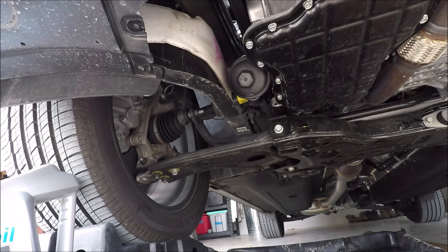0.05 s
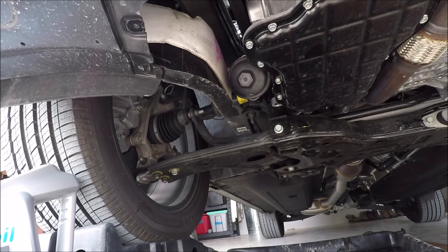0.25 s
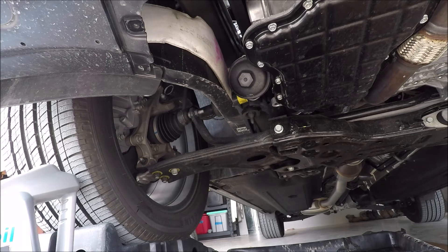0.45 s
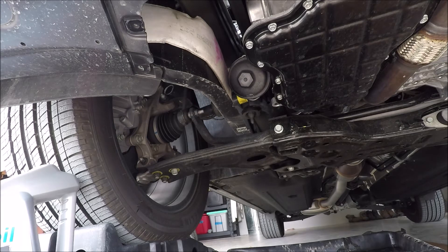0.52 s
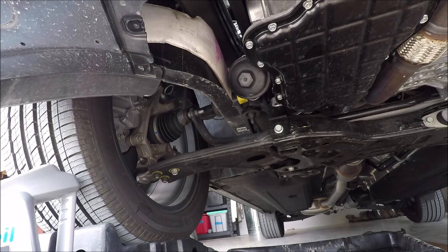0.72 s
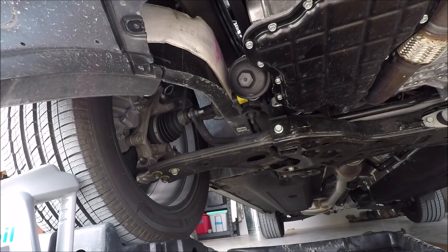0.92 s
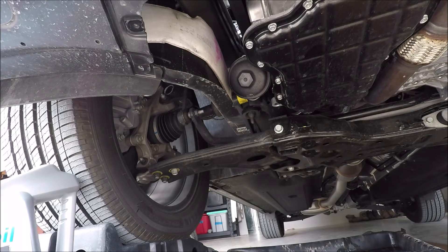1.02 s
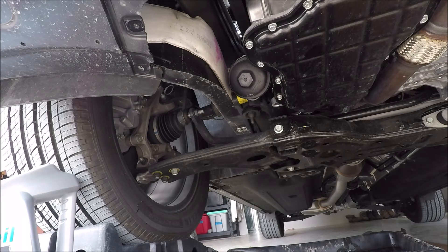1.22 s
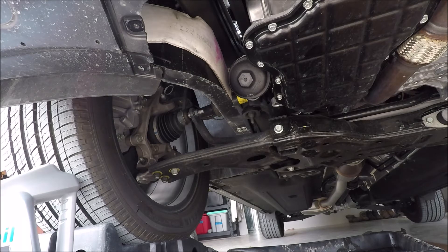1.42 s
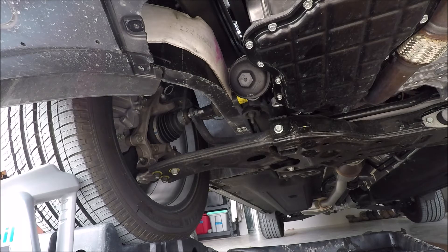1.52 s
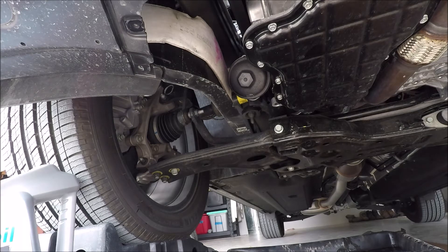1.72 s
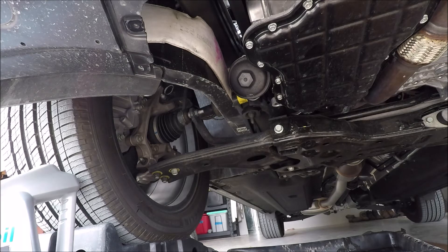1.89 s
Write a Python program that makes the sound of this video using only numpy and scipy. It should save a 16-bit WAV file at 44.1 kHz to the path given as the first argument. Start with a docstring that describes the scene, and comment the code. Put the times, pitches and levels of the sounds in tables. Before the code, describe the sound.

Oil drops into a drip pan under a car: one faint, one loud and sharp, then two very weak; cloth rustles, snaps and low handling knocks come between, close up over a faint garage rumble and hum.

```python
"""Throughout, a garage rumbles and hums faintly (shaped noise, wavering sine) and cloth rustles and crackles.
Cloth snaps come from the start; at 0.3 s a drop falls into a drip pan under a car, with a dull knock.
A low knock and snaps follow at 0.65 s, the loudest drop at 0.9 s, then knocks and snaps from 1.03 s
and two weak drops near 1.35 s. Drops are struck pan modes plus noise, snaps resonant noise bursts,
knocks damped sines. Drops and snaps also reverberate."""
import sys
import numpy as np
from scipy import signal
from scipy.fft import rfft, irfft
from scipy.io import wavfile
from scipy.ndimage import uniform_filter1d

SR = 44100
rng = np.random.default_rng(int(sys.argv[2]) if len(sys.argv) > 2 else 0)


def field_ratio(decibels):
    """Amplitude ratio for a level in dB (20 dB per decade); scalars and array-likes work."""
    return 10 ** (np.asarray(decibels, dtype=float) / 20)


def inscribe(sig):
    """Save sig as 16-bit PCM at rate SR to the path in sys.argv[1].

    A 1-D sig is mono; a 2-D sig holds one channel per row.
    Samples are clipped to [-1, 1] before scaling.
    """
    pcm = np.round(np.clip(np.atleast_2d(sig).T, -1, 1) * 32767)
    wavfile.write(sys.argv[1], SR, pcm.astype(np.int16))


N = 85995

# garage air spectrum, relative: (frequency [Hz], density [dB per Hz])
AIR_SPECTRUM = [(12, -22), (20, -4), (37, 4.5), (83, 0), (172, -24.5), (216, -16.5), (255, -21), (293, -21),
                (388, -25.5), (718, -35), (2140, -31.5), (2460, -29), (6360, -38.5), (14700, -48),
                (16000, -46)]
AIR_RMS_DB, PATCH_RMS_DB, SWELL_RMS_DB = -48.5, 1.2, 0.4
HUM_HZ, HUM_WAVER_RMS_HZ, HUM_WAVER_RMS_DB, HUM_DB = 143.3, 3, 4, -57.5

# reverberation under the car: (frequency [Hz], t60 [s])
ROOM_DECAY = [(300, 0.19), (2300, 0.55), (5000, 0.54), (12000, 0.36)]
ROOM_DB = -22.5

# cloth movement in stretches: (time [s], mid level [dB], treble re mid [dB],
# low rub re mid [dB], rub near 1 kHz re mid [dB])
CLOTH_MOVEMENT = [
    [(0.0, -64, -14, -1, -6), (0.004, -67, -21, 3, 0), (0.012, -51.5, -4.5, -7, -21),
     (0.032, -64, -23, -10, 0.5), (0.044, -59.5, -27, -11, -8), (0.066, -62.5, -23, -2, -1),
     (0.076, -57.5, -13, 1, -1), (0.082, -57.5, -33, 2, -9.5), (0.126, -61, -15, -8, 3),
     (0.136, -59, -4, 2.5, -9), (0.166, -61.5, -15, 10.5, -5), (0.178, -57.5, -7, -2, 4),
     (0.214, -50.5, 0, -1, -9.5), (0.266, -54.5, -12, 2.5, -1.5), (0.292, -59, -12, 4, -6),
     (0.322, -58, -23, 0.5, -4)],
    [(0.342, -59, -3, 6, 0), (0.356, -52.5, -8.5, -0.5, -11), (0.43, -57, -0.5, 10.5, 6),
     (0.446, -56.5, -51, 2.5, -4.5), (0.476, -67, -15, 4, -3), (0.528, -54, -16, -4, -15),
     (0.546, -64.5, -26, -5, -10), (0.554, -73, -8, 6, 3), (0.602, -77.5, -7, 13, -7),
     (0.648, -46.5, 3, -9, -2), (0.684, -53, -7, 5.5, -1.5), (0.758, -74, -8, 10.5, -4),
     (0.78, -65, -10, -14, -7), (0.8, -68.5, -10, 8, -4), (0.866, -62, -9, -1, -10),
     (0.885, -67, -17, 14, 10)],
    [(1.045, -65.5, 1.5, -1, -14), (1.049, -81, -16, 32, 11), (1.059, -58, -8, 2, -3),
     (1.075, -46, -3, 3.5, -4.5), (1.079, -46.5, -7.5, 5.5, -1)],
    [(1.089, -45, -7, 0, -3), (1.103, -60.5, -11, 9, -6), (1.199, -58.5, -11.5, -4.5, -5),
     (1.247, -69.5, -12, 0.5, -8), (1.311, -63.5, -15, 5.5, -17), (1.341, -70, 2, 8, 2),
     (1.351, -71.5, -21, -24, 5), (1.361, -70.5, -6, -6, -11), (1.371, -65, -28, -21, -21),
     (1.389, -74, -16, 10, -15), (1.409, -59, -8, -5.5, -11.5), (1.623, -54.5, -15, -1, -7.5),
     (1.773, -76, -8, 2, 1.5), (1.895, -52, -13, 0, -10), (1.917, -66, -12, 9.5, 6),
     (1.95, -56, -16, 1, -9.5)],
]
# cloth band spectra, relative: (frequency [Hz], density [dB per Hz])
CLOTH_MID_SPECTRUM = [(760, -36), (1300, -18.5), (1630, -1.5), (1810, 5), (1990, 3), (2350, 5.5), (2730, 5),
                      (3250, 1.5), (3470, -2.5), (3930, 5.5), (4390, 1), (5240, 6.5), (6520, -15),
                      (7070, -51), (7500, -11), (9750, -69), (16500, -120)]
CLOTH_TOP_SPECTRUM = [(3820, -96), (6500, 4), (7060, -2.5), (11400, -4.5), (14500, 0.5), (15600, -11),
                      (16000, -25)]
CLOTH_LOW_SPECTRUM = [(110, -18), (180, 3), (210, -11), (307, -4), (360, -2.5), (457, -1), (700, -22),
                      (910, -74), (1540, -120)]
CLOTH_KHZ_SPECTRUM = [(380, -21), (650, -21), (720, -8), (993, 3), (1270, -10.5), (1400, -9), (1820, -33),
                      (3080, -120)]
CRACKLES_PER_S, CRACKLE_SIZE_DB, CRACKLE_DECAY_S = 800, -0.5, 0.0015
CRACKLE_SHARE_LOW, CRACKLE_SHARE_MID, CRACKLE_SHARE_TOP = 0.15, 0.49, 0.69
STREAK_DB = 5.5  # rms from 1500 Hz up, less below

# sharp snaps of cloth: (time [s], peak [dB], centre [Hz], t60 of the drive [s])
SNAPS = [(.015, -44.5, 3900, 0.0054), (.075, -49, 2700, 0.0073), (0.1802, -43, 6030, 0.031),
         (.181, -42.5, 11000, 0.011), (.200, -37.5, 5850, 0.02), (.246, -43, 13300, 0.0067),
         (0.4172, -39.5, 10300, .006), (.330, -39, 3500, 0.0048), (.372, -37, 5300, 0.0093),
         (.417, -36.5, 5000, .008), (.643, -34, 5830, 0.051), (.654, -30, 5360, 0.0043),
         (.666, -30.5, 5500, 0.0033), (0.678, -32, 5470, 0.028), (.716, -47, 10100, 0.011),
         (1.0328, -44, 2900, 0.0096), (1.035, -57, 10300, 0.012), (1.067, -39, 2530, 0.012),
         (1.0822, -30.5, 10300, 0.0079), (1.0823, -19.5, 5450, 0.014), (1.238, -49, 5230, 0.0098)]
SNAP_WIDTH_RE_CENTRE = 0.12
SNAP_CLICK_RE_NOISE = 12

# knocks through the microphone body: (time [s], level before decay and rise [dB], frequency [Hz], t60 [s])
KNOCKS = [(1.032, -26.5, 960, 0.011), (.329, -33, 489, 0.046), (0.641, -35.5, 69, 0.17),
          (1.034, -19, 307, .015), (1.036, -26, 74.4, 0.12), (1.069, -22.5, 92.6, 0.085),
          (1.07, -33.5, 234, 0.11), (1.0713, -25, 387, 0.042)]

# drops: (time [s], rms of the first 5 ms without push [dB], treble tilt [dB per octave],
# damping factor [1, smaller counts as 1], push re that rms [dB])
DROPS = [(0.3269, -42, -3, 0.92, 0), (0.8935, -21, 1.5, 0.57, 4), (1.3488, -50, 0.5, 3.3, -4.0),
         (1.37, -51.5, -5, 0.56, 13.5)]
# pan modes, before tilt and damping: (frequency [Hz], relative level [dB], t60 [s])
PAN_MODES = [(480, -24, .035), (1150, -20, .03), (1320, -13, .02), (1550, -8, .015), (1760, -2, .016),
             (2050, -7, .015), (2290, -4, .03), (2335, -29, .2), (2410, -30, .16), (2700, -4, .045),
             (3820, -10, .02), (4170, -10, .022), (5040, -8, .025), (8390, -14, .012)]
# countless small pan modes, relative, before tilt: (frequency [Hz], density [dB per Hz])
SPLAT_SPECTRUM = [(180, -1), (300, 7.5), (737, -15.5), (1530, 1), (2700, 3), (3190, -7.5), (5160, -4),
                  (7200, -16), (10000, -15.5), (14700, -41), (16000, -40)]
# rattle, before damping: (frequency [Hz], t60 [s])
RATTLE_DECAY = [(500, 0.058), (2300, 0.13), (5000, 0.19), (8000, 0.16), (13000, .06)]
# levels re a pan mode of 0 dB, t60 before damping
SPLAT_DB, SPLAT_T60_S, RATTLE_DB = 1.5, 0.03, -14
STRIKE_RISE_S, SPLAT_RISE_S = 0.00086, 0.0023
PUSH_HZ, PUSH_T60_S, PUSH_RISE_S = 149, 0.025, 0.0024


def evened(x):
    """Scales x to rms 1."""
    return x / np.sqrt(np.mean(x ** 2) + 1e-20)


def read(points, hz):
    """Interpolates a table over log frequency."""
    table_hz, value = np.transpose(points)
    return np.interp(np.log(hz + 1), np.log(table_hz + 1), value)


def add(mix, start_s, sound):
    """Adds sound to mix in place, cut at the end."""
    part = mix[round(start_s * SR):][:len(sound)]
    part += sound[:len(part)]


def smoothed(x, size, axis=-1):
    """Moving average along one axis."""
    return uniform_filter1d(x, size=size, axis=axis)


def slow(count):
    """Random drift of rms 1, smoothed twice over count samples."""
    return evened(smoothed(smoothed(rng.standard_normal(N), count), count))


def coloured(x, points):
    """Weights the spectrum of x by the table, then sets rms 1."""
    gain = field_ratio(read(points, np.fft.rfftfreq(len(x), 1 / SR)))
    return evened(irfft(rfft(x) * gain, len(x)))


def dying(x, points):
    """Decays each frequency band of x at the t60 of the table."""
    hz, t, z = signal.stft(x, SR, nperseg=128)
    decay = field_ratio(-60 * t / read(points, hz)[:, None])
    return signal.istft(z * decay, SR, nperseg=128)[1][:len(x)]


def resonate(x, hz, width_hz):
    """One-pole resonance of gain 1, run on x shifted down to 0 Hz."""
    turn = np.exp(2j * np.pi * hz * np.arange(len(x)) / SR)
    r = np.exp(-np.pi * width_hz / SR)
    return 2 * (turn * signal.lfilter([1 - r], [1, -r], x / turn)).real


def air():
    """Rumble and air: shaped noise, with drifting patches and a swell above 200 Hz."""
    frames, hz = N // 512 + 5, np.fft.rfftfreq(2048, 1 / SR)[:, None]
    real, imag, patches = rng.standard_normal((frames, 1025, 3)).T
    patches = evened(smoothed(smoothed(patches, 24, axis=0), 6, axis=1))
    swell = evened(smoothed(rng.standard_normal(frames), 20))
    drift_db = (PATCH_RMS_DB * patches + SWELL_RMS_DB * swell) * (hz > 200)
    z = (real + 1j * imag) * field_ratio(read(AIR_SPECTRUM, hz) + drift_db)
    noise = signal.istft(z, nperseg=2048, noverlap=1536)[1][:N]
    return field_ratio(AIR_RMS_DB) * evened(noise)


def hum():
    """One sine whose level and pitch waver at random."""
    waver = field_ratio(HUM_WAVER_RMS_DB * slow(3000))
    hz = HUM_HZ + HUM_WAVER_RMS_HZ * slow(3000)
    return field_ratio(HUM_DB) * waver * np.sin(2 * np.pi * np.cumsum(hz) / SR)


def room(x):
    """Sparse taps of random sign under the car, each band dying at its own speed."""
    taps = np.zeros(SR // 2)
    at = np.arange(200, SR // 2 - 20, 20)
    taps[at + rng.integers(0, 20, len(at))] = rng.choice([-1., 1.], len(at))
    tail = dying(taps, ROOM_DECAY)
    return signal.fftconvolve(x, tail / np.linalg.norm(tail))[:N]


def streaked(x):
    """Narrow bands of x swell and fade for some 50 ms each."""
    hz, t, z = signal.stft(x, SR, nperseg=1024, noverlap=768)
    field = rng.standard_normal(z.shape[::-1]).T
    field = evened(smoothed(smoothed(field, 3, axis=0), 10, axis=1))
    streak_db = STREAK_DB * field * np.clip(hz[:, None] / 1500, 0.3, 1)
    return evened(signal.istft(z * field_ratio(streak_db), SR, nperseg=1024, noverlap=768)[1][:N])


def crackles():
    """Noise in short decaying bursts at random times."""
    size_db = CRACKLE_SIZE_DB * np.minimum(rng.exponential(1, N), 2.8)
    starts = field_ratio(size_db) * (rng.random(N) < CRACKLES_PER_S / SR)
    bursts = signal.lfilter([1], [1, -np.exp(-1 / (CRACKLE_DECAY_S * SR))], starts)
    return evened(bursts * rng.standard_normal(N))


def cloth():
    """Rubbing noise and crackles, shared by four bands that follow the movement."""
    s, mid_db, top_db, low_db, khz_db = np.concatenate(CLOTH_MOVEMENT).T
    t = np.arange(N) / SR
    crackle, rub = crackles(), streaked(rng.standard_normal(N))
    bands = ((CLOTH_MID_SPECTRUM, CRACKLE_SHARE_MID, mid_db),
             (CLOTH_TOP_SPECTRUM, CRACKLE_SHARE_TOP, mid_db + top_db),
             (CLOTH_LOW_SPECTRUM, CRACKLE_SHARE_LOW, mid_db + low_db),
             (CLOTH_KHZ_SPECTRUM, CRACKLE_SHARE_LOW, mid_db + khz_db))
    total = np.zeros(N)
    for spectrum, share, level_db in bands:
        band = coloured(share * crackle + (1 - share) * rub, spectrum)
        total += field_ratio(np.interp(t, s, level_db)) * band
    return total


def snap(peak_db, hz, t60_s):
    """A click and decaying noise through a narrow and a wide resonance at one pitch."""
    t = np.arange(2000) / SR
    drive = (rng.standard_normal(2000) + SNAP_CLICK_RE_NOISE * (t == 0)) * field_ratio(-60 * t / t60_s)
    burst = resonate(resonate(drive, hz, SNAP_WIDTH_RE_CENTRE * hz), hz, hz)
    return field_ratio(peak_db) * burst / abs(burst).max()


def knock(db, hz, t60_s):
    """A damped swing of the microphone body: a decaying sine with a 3.4 ms rise."""
    t = np.arange(SR // 5) / SR
    return field_ratio(db - 60 * t / t60_s) * np.sin(2 * np.pi * hz * t) * np.minimum(t / 0.0034, 1)


def pan_ring(t, tilt_db, damping):
    """Pan modes as decaying sines of random phase."""
    ring = np.zeros(len(t))
    for hz, mode_db, t60_s in PAN_MODES:
        level_db = mode_db + tilt_db * np.log2(hz / 2000) - 60 * t * damping / t60_s
        ring += field_ratio(level_db) * np.sin(2 * np.pi * (hz * t + rng.random()))
    return ring


def splat_and_rattle(t, tilt_db, damping):
    """One noise for the countless small modes: a short splat and a rattle decaying band by band."""
    spectrum = [(hz, db + tilt_db * np.log2(hz / 2000)) for hz, db in SPLAT_SPECTRUM]
    noise = coloured(rng.standard_normal(len(t)), spectrum)
    splat = field_ratio(SPLAT_DB - 60 * t * damping / SPLAT_T60_S) * noise
    rattle = field_ratio(RATTLE_DB) * dying(noise, [(hz, t60_s / damping) for hz, t60_s in RATTLE_DECAY])
    return (splat + rattle) * np.minimum(t / SPLAT_RISE_S, 1)


def drop(rms_db, tilt_db, damping, push_db):
    """The drop strikes the pan's modes, leaves a noisy rattle and pushes its floor once."""
    t, damping = np.arange(SR // 3) / SR, max(damping, 1)
    hit = pan_ring(t, tilt_db, damping) * np.minimum(t / STRIKE_RISE_S, 1)
    hit = hit + splat_and_rattle(t, tilt_db, damping)
    push = field_ratio(push_db - 60 * t / PUSH_T60_S) * np.sin(2 * np.pi * PUSH_HZ * t)
    push = push * np.minimum(t / PUSH_RISE_S, 1)
    return field_ratio(rms_db) * (hit / np.sqrt(np.mean(hit[:220] ** 2)) + push)


def scene():
    """Drops and snaps with reverberation; knocks, cloth, air and hum without."""
    near, body = np.zeros(N), np.zeros(N)
    for start_s, *settings in DROPS:
        add(near, start_s, drop(*settings))
    for start_s, *settings in SNAPS:
        add(near, start_s, snap(*settings))
    for start_s, *settings in KNOCKS:
        add(body, start_s, knock(*settings))
    mix = near + field_ratio(ROOM_DB) * room(near) + body + cloth() + air() + hum()
    return mix[None]


def band_limit(x):
    """A steep low-pass at the top of the band."""
    return signal.sosfilt(signal.butter(12, 16480, fs=SR, output="sos"), x)


def record(dry):
    """Low-passes the mix at 16 kHz."""
    lowpass = signal.firwin(101, 16000, fs=SR)
    limited = signal.oaconvolve(dry, lowpass[None], "same")
    return band_limit(limited)


dry = scene()
out = record(dry)
inscribe(out)
```